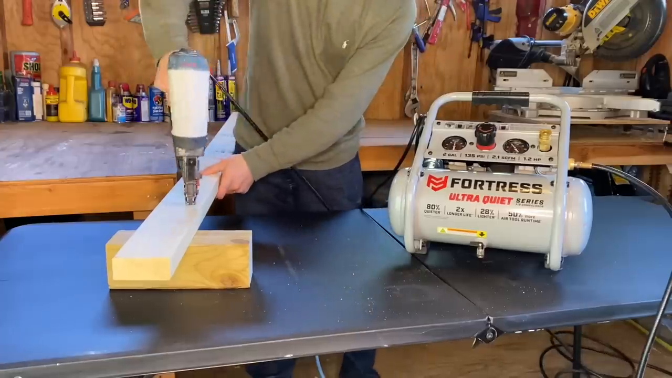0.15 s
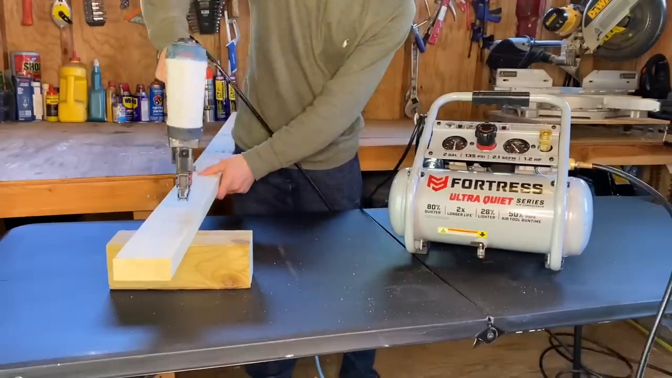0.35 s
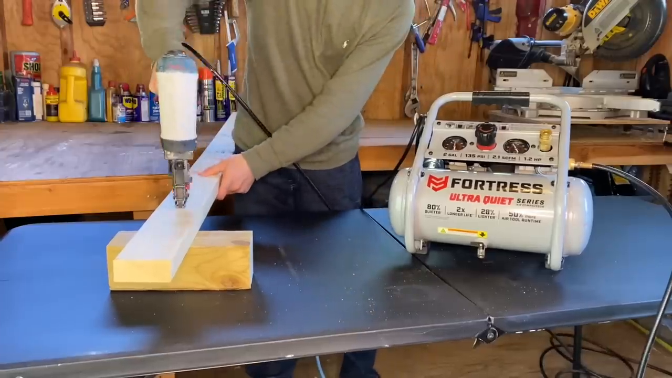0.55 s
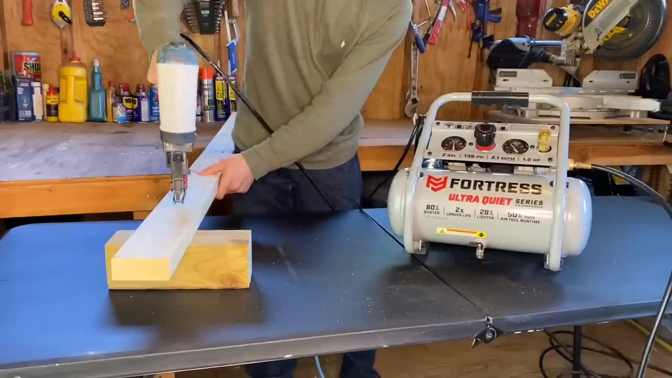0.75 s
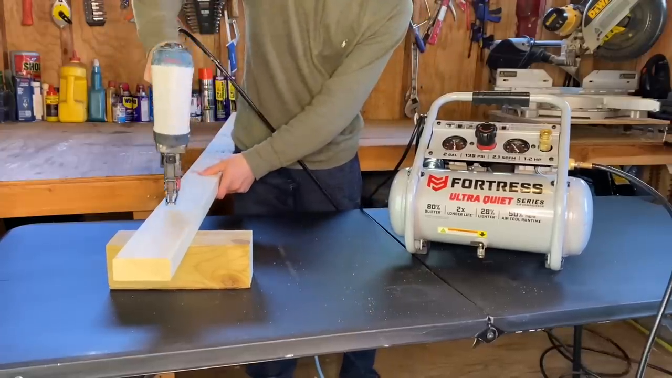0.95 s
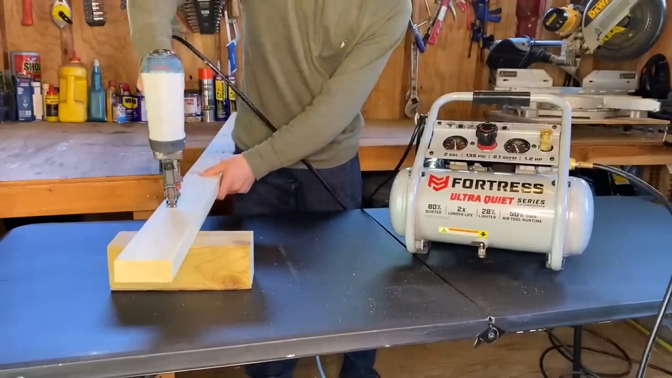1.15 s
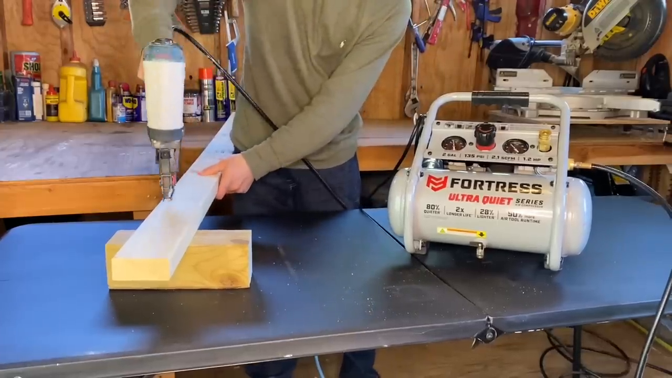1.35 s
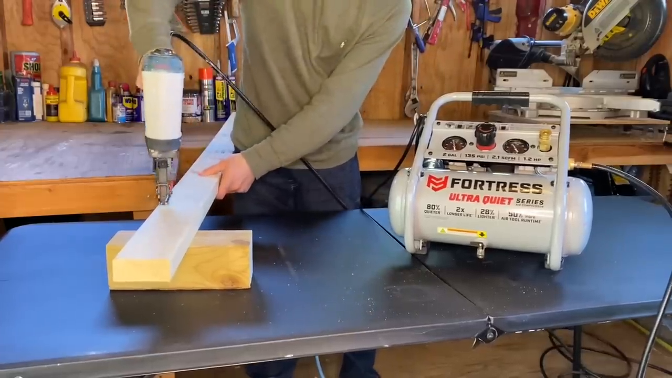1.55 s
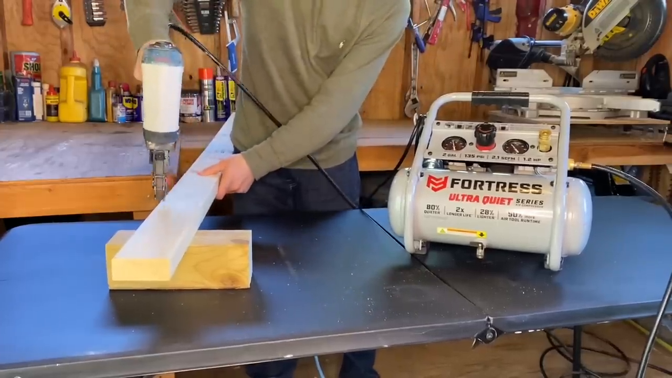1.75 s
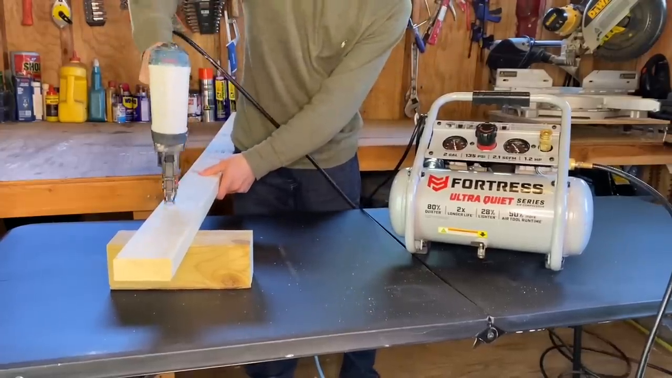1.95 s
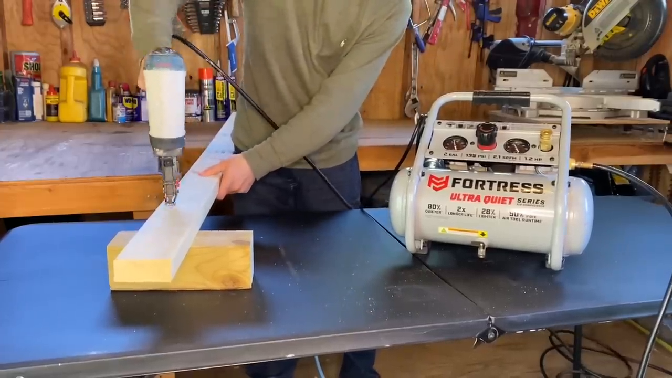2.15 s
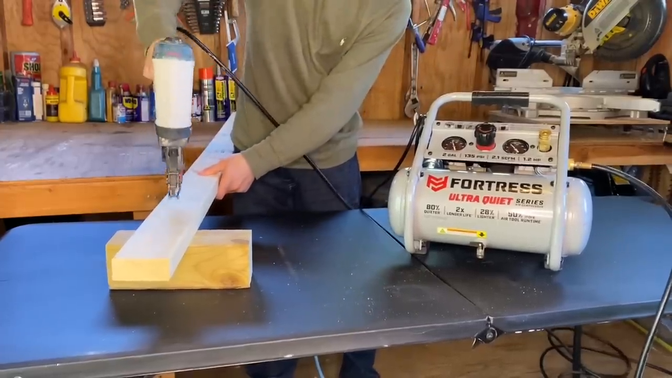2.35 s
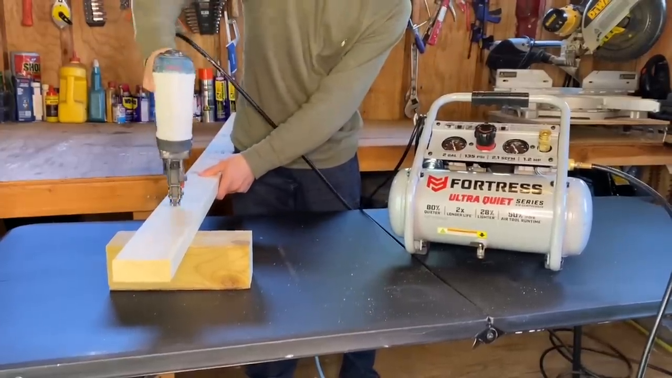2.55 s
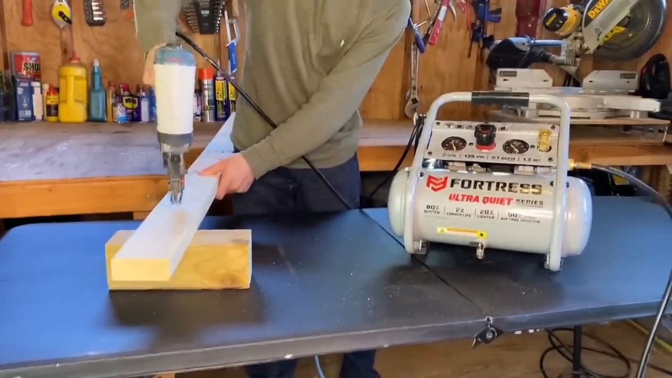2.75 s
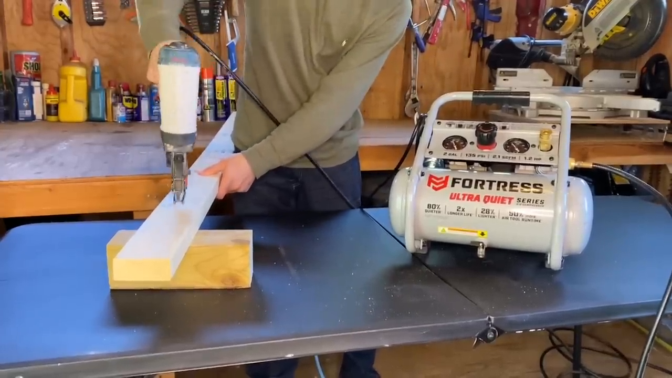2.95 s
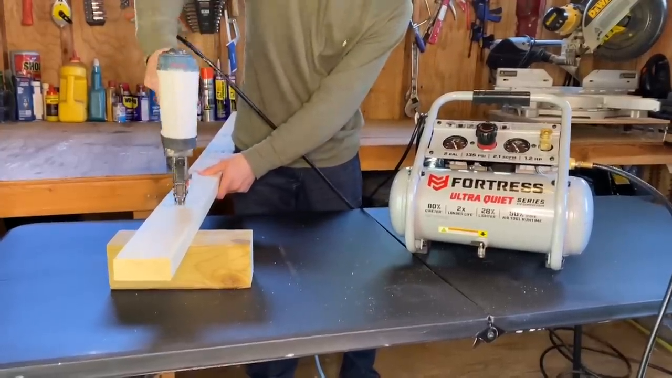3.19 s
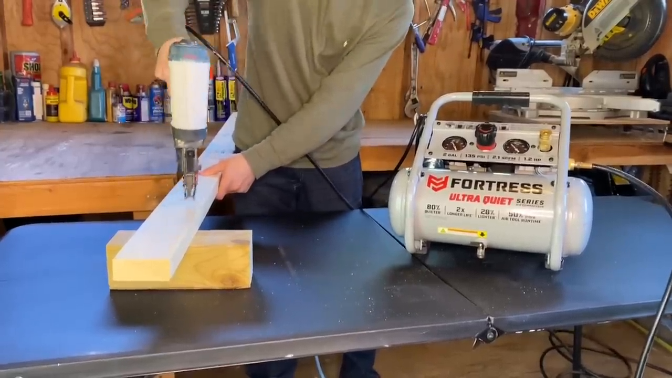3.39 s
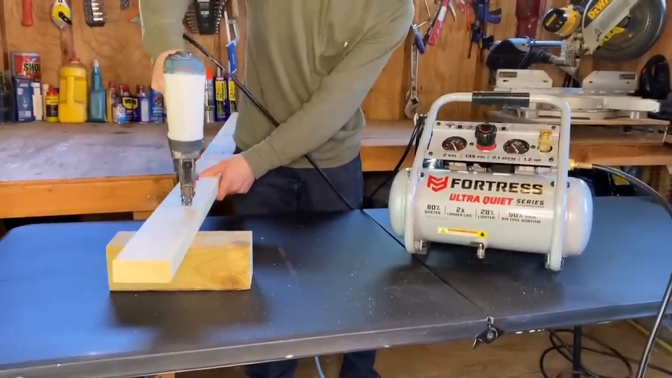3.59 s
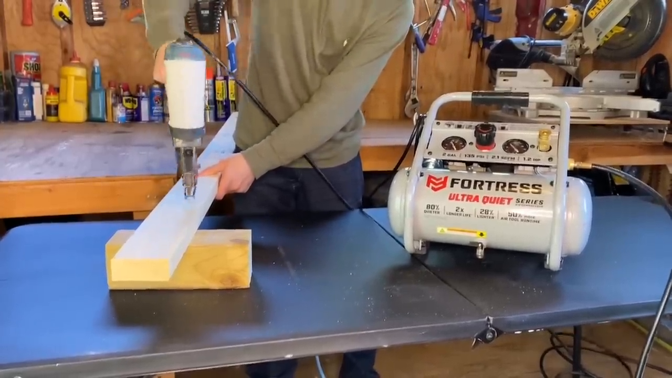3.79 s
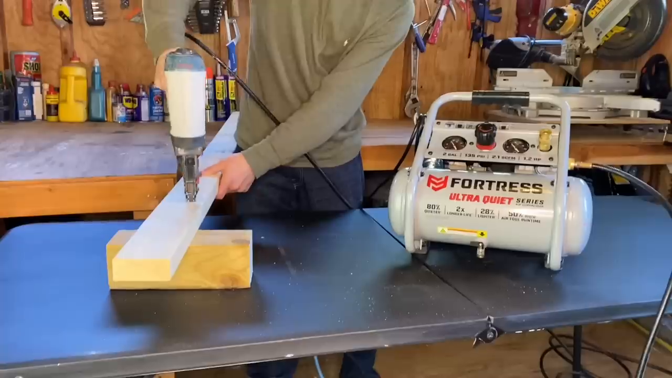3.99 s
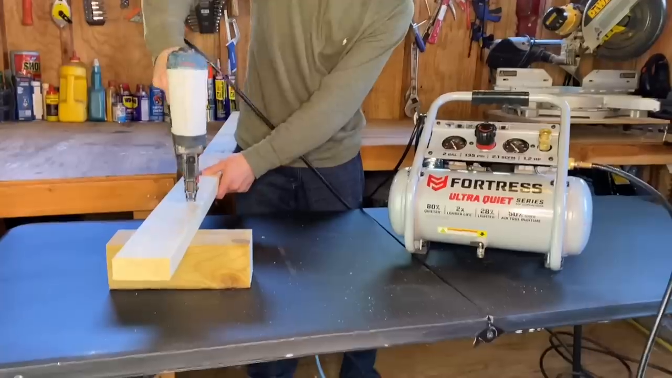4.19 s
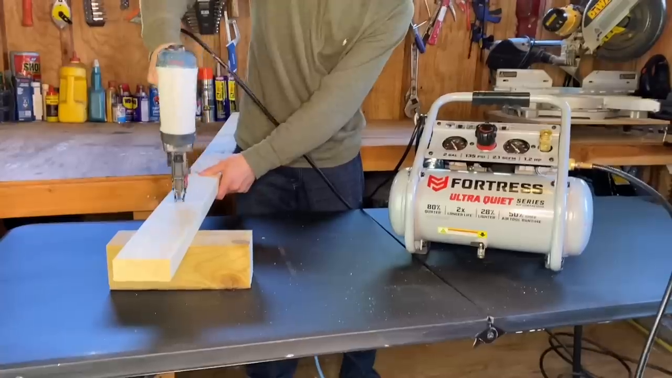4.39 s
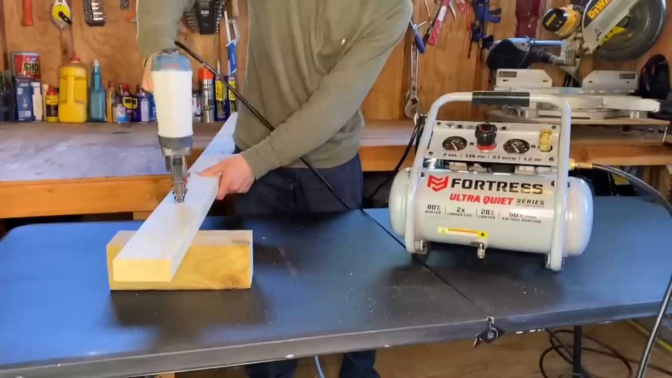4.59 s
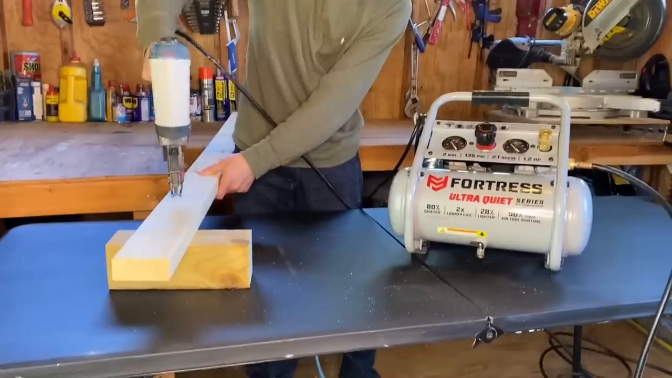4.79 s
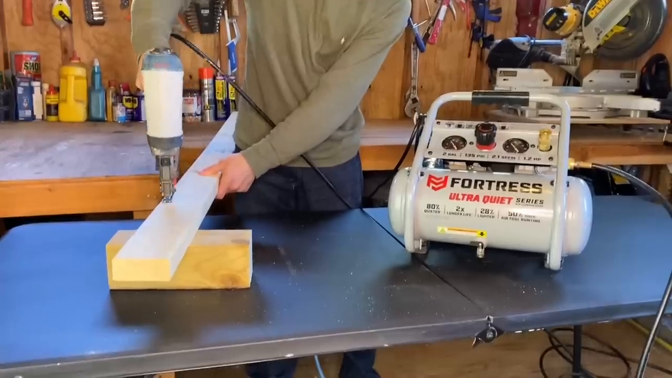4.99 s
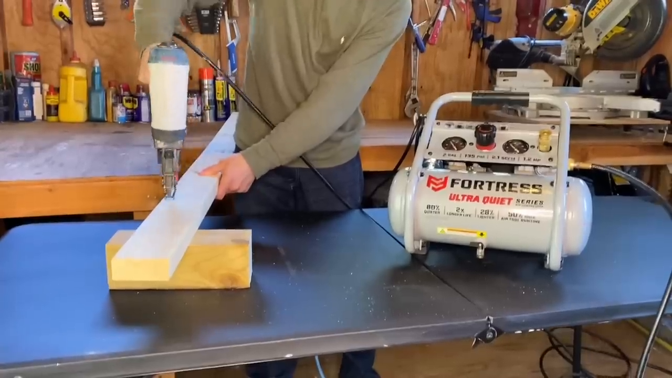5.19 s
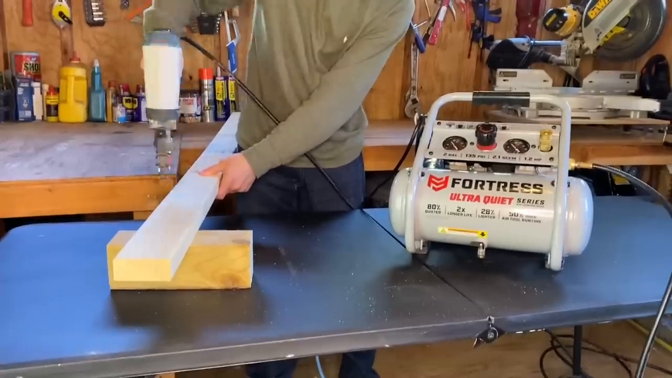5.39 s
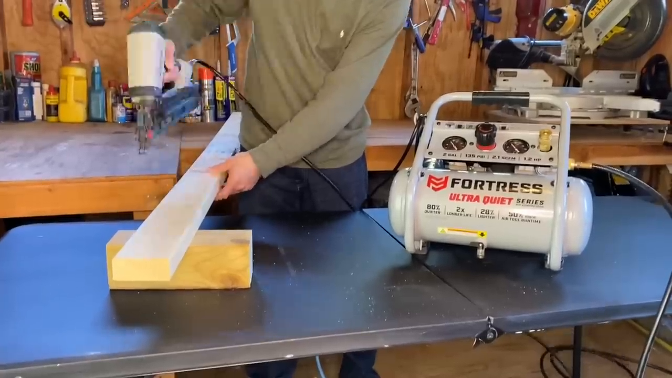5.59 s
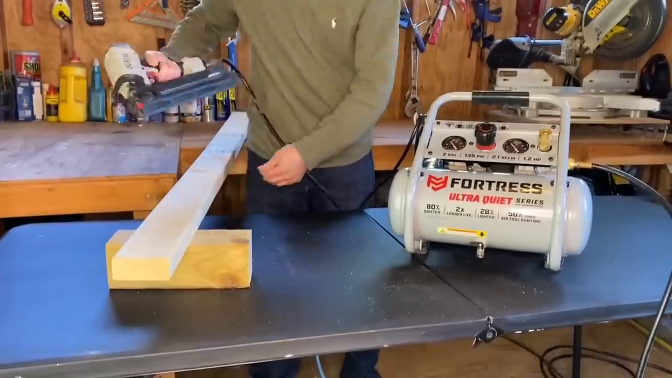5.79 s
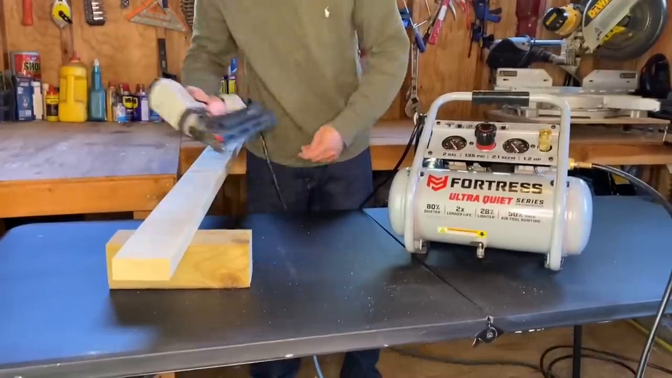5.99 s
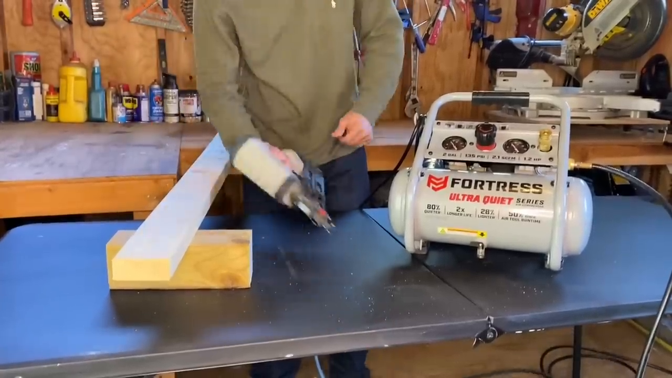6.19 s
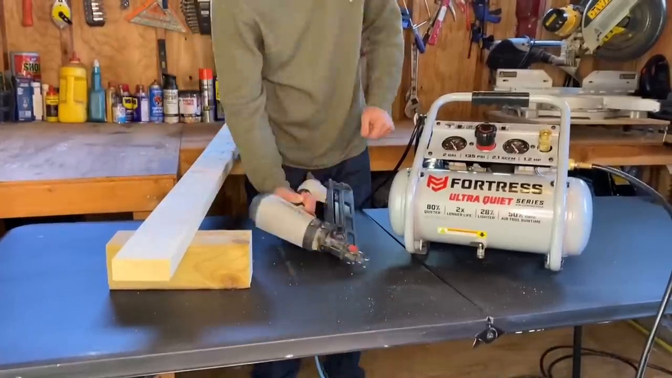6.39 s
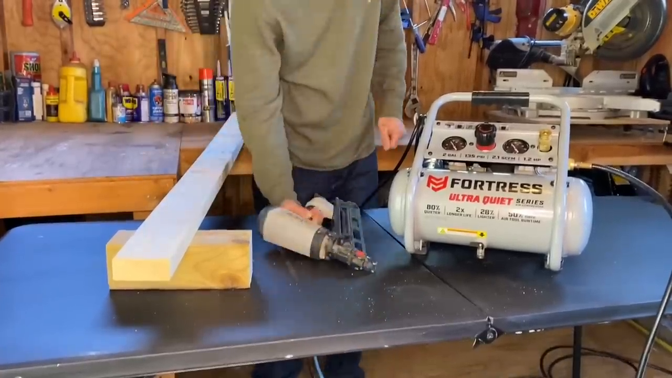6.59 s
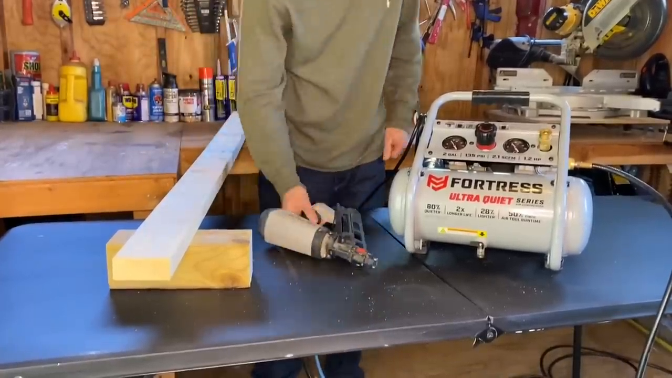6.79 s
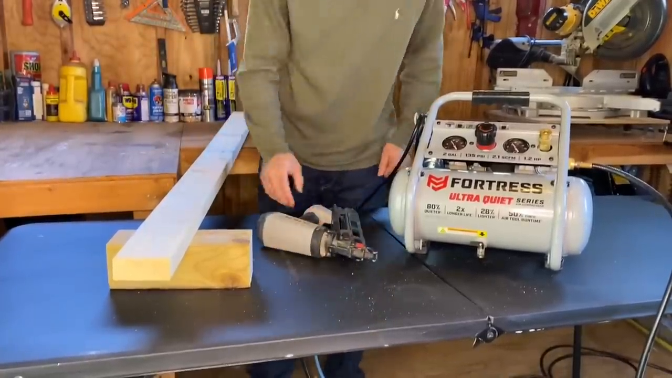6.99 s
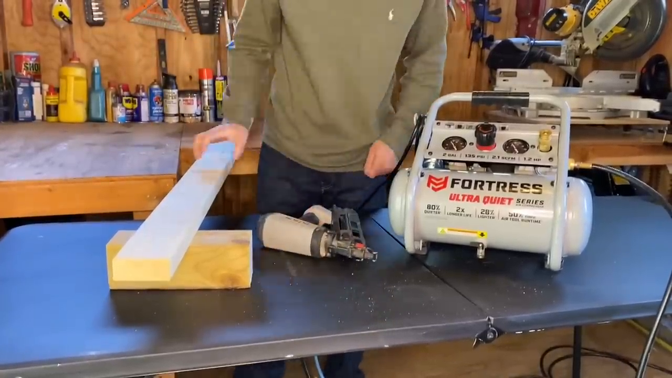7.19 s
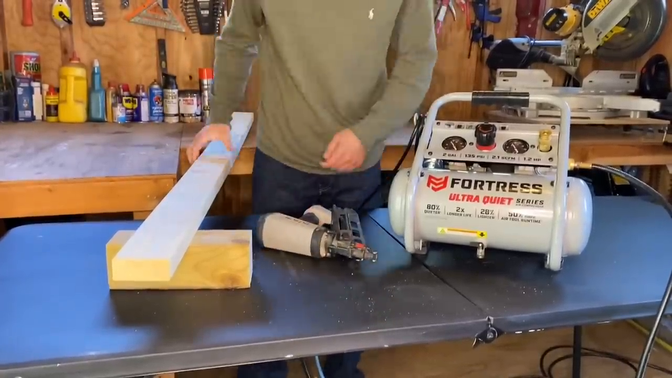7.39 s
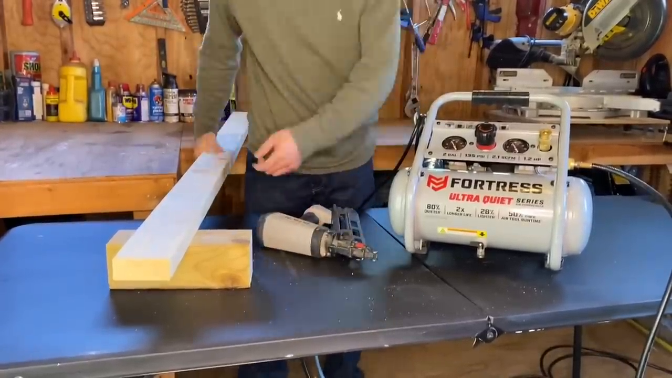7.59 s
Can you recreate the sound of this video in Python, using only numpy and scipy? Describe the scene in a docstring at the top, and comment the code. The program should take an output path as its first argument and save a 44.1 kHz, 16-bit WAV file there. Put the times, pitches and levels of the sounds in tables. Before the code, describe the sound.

A pneumatic nailer fires into a wooden board right from the start, eleven shots about half a second apart, the last at around 5 seconds. Each is a pop and a hard metallic crack with a woody thud, followed at once by a spurt of exhaust air and a smaller knock. The shots are loud enough to overload the microphone slightly and die away quickly in a small workshop. Between them the nose of the tool taps lightly on the wood. At about 1.8 seconds a quiet compressor starts with a brief, faint hiss and settles into a low, steady hum with a fine rattle, far below the shots. From about 6.3 to 7 seconds the nailer is laid on a table with a small steel click and several soft thuds and knocks. The compressor hums on until the end, near 7.7 seconds.

```python
"""Pneumatic nailer in a small workshop

Eleven nails are driven into a board on a folding table, loud enough to overload the microphone.
Each shot is a valve pop, the driver's impact, a jet of exhaust and the knock of the returning piston;
between shots the nose taps the wood. A quiet compressor starts after the fourth shot and hums on.
At the end the nailer is laid on the table."""
import sys
import numpy as np
from scipy import signal
from scipy.fft import rfft, irfft, next_fast_len
from scipy.io import wavfile
from scipy.ndimage import map_coordinates

SR = 44100
rng = np.random.default_rng(int(sys.argv[2]) if len(sys.argv) > 2 else 0)


def waveform_to_disk(signal):
    """Save audio, clipped to [-1, 1], as 16-bit WAV at the path in sys.argv[1]."""
    frames = np.transpose(np.atleast_2d(signal))
    scaled = np.clip(frames, -1, 1) * 32767
    samples = np.round(scaled).astype(np.int16)
    wavfile.write(sys.argv[1], SR, samples)


N = 337263
CLOCK = np.arange(N) / SR  # time in the scene [s]
T = np.arange(SR // 2) / SR  # time since an impact [s]
COMPRESSOR_ON_S = 1.796

# shots: (time of the valve pop [s], steel clash gain [dB], exhaust gain [dB])
SHOTS = [(-.029, 1.5, 0.5), (0.5345, 1, 1), (1.0467, 0.5, 1), (1.536, 1.5, 0.5), (2.0412, 0, 0.5),
         (2.5196, 1, 1.5), (3.0173, -2, 0.5), (3.5098, -5, 1), (3.9814, 1, 2.5), (4.4484, 0.5, 1),
         (4.9575, -3, 0)]
# spectra of a thud on the table and a click of steel: (frequency [Hz], relative density [dB])
THUD_SPECTRUM = [(40, -18), (85, -7), (130, -1), (180, -1), (250, -9.5), (400, -8.5), (700, -46),
                 (3000, -73), (16000, -120)]
CLICK_SPECTRUM = [(2500, -7), (4000, 2.5), (6000, -8.5), (8500, -8), (13000, -24), (16000, -33)]


def amp(db):
    """Amplitude ratio of a level in decibels."""
    return 10 ** (np.asarray(db) / 20)


def unit(x):
    """Normalisation to an rms of 1."""
    return x / np.sqrt(np.mean(x ** 2) + 1e-20)


def along(points, hz):
    """Interpolation of (frequency [Hz], value) points on a logarithmic frequency axis."""
    f, v = np.transpose(points)
    return np.interp(np.log(hz + 1), np.log(f + 1), v)


def filtered(x, gain):
    """Zero-phase filtering: the spectrum is multiplied by gain(frequency)."""
    m = next_fast_len(len(x) + 4096)
    return irfft(rfft(x, m) * gain(np.fft.rfftfreq(m, 1 / SR)), m)[:len(x)]


def noise(spectrum, size=len(T)):
    """White noise shaped by a spectral envelope, at an rms of 1."""
    return unit(filtered(rng.standard_normal(size), lambda hz: amp(along(spectrum, hz))))


def add(track, s, sound):
    """Superposition of a sound on the track from time s."""
    i = round(s * SR)
    part = sound[max(-i, 0):max(N - i, 0)]
    track[max(i, 0):max(i, 0) + len(part)] += part


def fade(t60, attack):
    """Envelope of a damped vibration: a quick rise, and a fall of 60 dB in t60 seconds."""
    return amp(-60 * T / t60) * (1 - np.exp(-T / attack))


def rise(start, attack_s):
    """Linear onset: 0 until start, then a ramp to 1."""
    return np.clip((CLOCK - start) / attack_s, 0, 1)


def release(start, t60):
    """Free decay: 1 until start, then an exponential fall."""
    return amp(-60 * np.maximum(CLOCK - start, 0) / t60)


def room_decay(x):
    """Absorption: each frequency dies away with the room's reverberation time."""
    # (frequency [Hz], reverberation time [s])
    decay_times = [(100, 0.51), (400, 0.37), (1000, 0.31), (4000, 0.35), (8000, 0.34), (16000, 0.27)]
    hz, t, spectra = signal.stft(x, SR, nperseg=256)
    decay = amp(-60 * t / along(decay_times, hz)[:, None])
    return signal.istft(spectra * decay, SR, nperseg=256)[1][:len(x)]


def ripple(depth_db=2, spacing_hz=45):
    """Dense resonances of a metal body: a gain with random peaks and dips over frequency."""
    knots = rng.standard_normal(4000)
    return lambda hz: amp(depth_db * np.interp(hz / spacing_hz, np.arange(len(knots)), knots))


def bursts(spectrum, alike_hz):
    """Scattering, one burst a shot: long waves repeat their path, short ones scatter anew."""
    coherence = lambda hz: .8 / (1 + (hz / alike_hz) ** 4)
    repeated = filtered(noise(spectrum), lambda hz: np.sqrt(coherence(hz)))
    metal = ripple()
    fresh = [unit(filtered(noise(spectrum), metal)) for _ in SHOTS]
    return [room_decay(repeated + filtered(x, lambda hz: np.sqrt(1 - coherence(hz)))) for x in fresh]


def rings(modes, detune, spread_db=0):
    """Modal synthesis, one undamped ring a shot: each new point of impact shifts the modes a little."""
    hz, db = np.transpose(modes)[:, :, None]
    phase = rng.uniform(0, 2 * np.pi, hz.shape)
    size = amp(db) / np.sqrt(np.sum(amp(db) ** 2) / 2)
    chance = rng.standard_normal((len(SHOTS), 2) + hz.shape)
    return [np.sum(amp(spread_db * louder) * size
                   * np.sin(2 * np.pi * hz * (1 + detune * sharper) * T + phase), 0)
            for louder, sharper in chance]


def room_tone():
    """The noise floor of the quiet shop: stationary and strongest in the bass."""
    # (frequency [Hz], relative density [dB])
    spectrum = [(20, -10), (45, -2), (110, -4.5), (300, -21), (1000, -19), (2000, -28), (4500, -26.5),
                (6500, -38), (8700, -31), (11000, -47), (16000, -47.5)]
    return amp(-54) * noise(spectrum, N)


def casing(hz):
    """Resonance: the gain with which the pump's head and casing colour its noise."""
    # (centre frequency [Hz], half width [Hz], boost [dB])
    resonances = [(2680, 120, 3.5), (3840, 120, 4), (4820, 110, 5.5), (7860, 200, 5.5)]
    return amp(sum(db / (1 + ((hz - centre) / width) ** 2) for centre, width, db in resonances))


def compressor(stroke_hz=28.02, hum_hz=120, frame_hz=176, lag_s=.033, spin_up_s=.075, surge_db=4):
    """Periodic forcing: each stroke rattles and draws air; the motor's hum beats with the 4th harmonic."""
    # one stroke's rattle: (frequency [Hz], relative level [dB])
    rattle_spectrum = [(140, -39), (250, 5), (340, 5.5), (480, -3.5), (580, -1), (700, -2.5), (900, 8),
                       (1100, 5), (1350, -11.5), (2000, -12), (2700, -4.5), (3700, -7), (4300, -19),
                       (8000, -18), (14000, -41)]
    # intake air: (frequency [Hz], relative density [dB])
    intake_spectrum = [(94, -30), (160, -1), (249, -15), (345, -8), (366, -26), (498, -11), (558, -20),
                       (717, -21), (774, -15), (976, -7.5), (1740, -14.5), (3540, -11.5), (5510, -29.5),
                       (10200, -31), (15900, -63)]
    # strong harmonics: (multiple of the stroke rate [1]) and, for each, (level [dB])
    orders = np.array([1, 2, 3, 4, 6, 8, 25, 26, 30, 33, 34, 36, 38, 42])
    order_db = [-61, -51.5, -54.5, -51, -75, -56.5, -54.5, -56.5, -60, -54.5, -55.5, -54.5, -57.5, -55]
    drift = map_coordinates(rng.standard_normal(40), [CLOCK * 4])
    turns = stroke_hz * CLOCK + .0026 * drift
    size = 2048  # samples in one stroke
    hz = np.arange(size // 2 + 1) * stroke_hz
    phases = np.exp(2j * np.pi * rng.random(len(hz)))
    stroke = unit(irfft(amp(along(rattle_spectrum, hz)) * casing(hz) * phases))
    rattle = amp(-46) * map_coordinates(stroke, [turns % 1 * size], mode="grid-wrap")
    shake = sum(amp(db) * np.sqrt(2) * np.sin(2 * np.pi * (k * turns + rng.random()))
                for k, db in zip(orders, order_db))
    pulsing = 1 + .17 * (np.cos(2 * np.pi * 8 * turns) + np.cos(2 * np.pi * 3 * turns))
    metal = ripple()
    intake = filtered(noise(intake_spectrum, N), lambda f: casing(f) * metal(f))
    air = amp(-44) * unit(pulsing * intake)
    frame_mode = lambda f: 1 / (1 + ((f - frame_hz) / 4) ** 2)
    frame = amp(-50) * unit(filtered(rng.standard_normal(N), frame_mode))
    hum = amp(-44) * np.sqrt(2) * np.sin(2 * np.pi * hum_hz * CLOCK)
    pump_level = rise(COMPRESSOR_ON_S + lag_s, spin_up_s)  # the pump follows the motor
    strain = amp(surge_db * release(COMPRESSOR_ON_S + lag_s + spin_up_s, t60=1.3))
    motor_level = rise(COMPRESSOR_ON_S, attack_s=.066) * strain
    return pump_level * (rattle + shake + air + frame) + motor_level * hum


def start_hiss(attack_s=.04, hold_s=.068):
    """Turbulence: air hisses briefly as the compressor starts."""
    # (frequency [Hz], relative density [dB])
    spectrum = [(2000, -17), (4500, -3), (8500, 8), (11000, 0), (16000, -20)]
    level = rise(COMPRESSOR_ON_S, attack_s) * release(COMPRESSOR_ON_S + attack_s + hold_s, t60=.32)
    return amp(-47) * level * noise(spectrum, N)


def table_sway(attack_s=.064):
    """Damped vibration: each shift of weight rocks the table top, far down in the bass."""
    # the table takes the tool's weight, the hands let go: (time [s], relative level [dB])
    sways = [(6.31, -19.5), (6.64, -22.5), (7.02, -21), (7.26, -27.5)]
    # (frequency [Hz], relative density [dB])
    spectrum = [(5, -24), (12, 12.5), (22, -5), (32, -22), (60, -47), (200, -90)]
    level = sum(amp(db) * rise(s, attack_s) * release(s + attack_s, t60=.76) for s, db in sways)
    return amp(-1) * level * noise(spectrum, N)


def laying_down():
    """A series of impacts: the steel nose clicks down, then table and housing bump as the tool settles."""
    # (time [s], table thud level [dB], housing knock level [dB])
    bumps = [(6.335, -31, -33.5), (6.356, -27.5, -49), (6.4, -32, -42), (6.495, -31, -35.5),
             (6.547, -33.5, -55), (6.641, -41, -31.5), (6.68, -33, -39), (6.868, -34.5, -39.5),
             (6.903, -33.5, -57), (6.978, -37.5, -60)]
    # (frequency [Hz], relative density [dB])
    housing_spectrum = [(150, -29), (300, 0), (450, -2.5), (620, -5), (850, -17), (2000, -19), (6000, -43),
                        (16000, -90)]
    out = np.zeros(N)
    add(out, bumps[0][0], amp(-42) * noise(CLICK_SPECTRUM) * fade(t60=.14, attack=.00082))
    for s, thud_db, knock_db in bumps:
        table = amp(thud_db) * noise(THUD_SPECTRUM) * fade(t60=1.8, attack=.003)
        housing = amp(knock_db) * noise(housing_spectrum) * fade(t60=1, attack=.00079)
        add(out, s, room_decay(table + housing))
    return out


def nose_taps(travel_s=.046):
    """Contact noise: the nose touches, then seats, exciting wood, table, steel and the safety catch."""
    # nose pressed home: (time [s], wood gain [dB], table gain [dB])
    presses = [(0.429, -15, -24.5), (0.917, -21, -24.5), (1.409, -21.5, -31.5), (1.919, -23, -26.5),
               (2.411, -19.5, -28), (2.949, -24.5, -40), (3.413, -19, -32), (3.905, -13.5, -29.5),
               (4.383, -27, -42)]
    # stray clicks as the tool is moved: (time [s], steel gain [dB])
    clicks = [(0.398, -36), (1.725, -28.5), (5.354, -46)]
    # (frequency [Hz], relative density [dB])
    wood_spectrum = [(200, -7), (400, 3.5), (900, 7), (1800, -5), (3700, -1.5), (5500, -32), (12000, -45)]
    # (frequency [Hz], relative level [dB])
    catch_modes = [(3050, 3.5), (3650, -6), (4850, -9), (6830, -7), (8660, -14), (13260, -19)]
    # (time [s], wood gain [dB], table gain [dB], steel gain [dB])
    contacts = [(s - travel_s, -24, -39, -51) for s, _, _ in presses]  # the first light touch
    contacts += [(s, wood_db, table_db, -41) for s, wood_db, table_db in presses]
    contacts += [(s, db + 13, db - 6, db) for s, db in clicks]
    out = np.zeros(N)
    for s, wood_db, table_db, steel_db in contacts:
        wood = amp(wood_db - 15) * noise(wood_spectrum) * fade(t60=1, attack=.0013)
        table = amp(table_db - 1) * noise(THUD_SPECTRUM) * fade(t60=8.3, attack=.013)
        steel = amp(steel_db - 1) * noise(CLICK_SPECTRUM) * (fade(t60=.076, attack=.00033) + amp(-9.5))
        catch = sum(amp(db + rng.normal(0, 2)) * np.sin(2 * np.pi * hz * T) for hz, db in catch_modes)
        ping = amp(steel_db - 13) * catch * fade(t60=.2, attack=.0005)
        add(out, s, room_decay(wood + table + steel) + ping)
    return out


def piston(return_s=.1124, lag_s_per_shot=.001):
    """Impact and reflection: the piston knocks on its seat, later each shot as the tank drains."""
    # (frequency [Hz], relative density [dB])
    body_spectrum = [(60, -10), (170, -14), (260, -24), (400, -12.5), (750, 0.5), (1100, -5.5),
                     (1500, -4.5), (2200, -18), (3600, -14.5), (5000, -17.5), (12000, -32)]
    # (frequency [Hz], relative level [dB])
    seat_modes = [(365, -4.5), (561, -22), (633, -16.5), (715, 0), (755, 0), (812, -21), (908, -24),
                  (964, -4), (1034, -6.5), (1366, -6)]
    # direct sound, then echoes from bench and walls: (delay [s], gain [dB])
    paths = [(0, 0), (.0032, -4), (.0108, -7), (.0142, -7)]
    knock = amp(-2) * np.sin(2 * np.pi * 880 * T) * fade(t60=.009, attack=.0001)
    bodies = bursts(body_spectrum, alike_hz=2500)
    seats = rings(seat_modes, detune=.014, spread_db=4)
    out = np.zeros(N)
    for fired, ((s, _, _), body, seat) in enumerate(zip(SHOTS, bodies, seats)):
        at = s + return_s + lag_s_per_shot * fired
        add(out, at, amp(-18.5) * body * fade(t60=1, attack=.00026))
        add(out, at, amp(-21) * seat * fade(t60=.19, attack=.0004))
        for delay, db in paths:
            add(out, at + delay, amp(db) * knock)
    return out


def exhaust(delay_s=.066):
    """Jet noise: spent air spurts out of the cap, then trails off."""
    # (frequency [Hz], relative density [dB])
    jet_spectrum = [(1500, -38), (3500, 1), (5500, -8.5), (8500, -1.5), (11000, -8.5), (16000, -23.5)]
    flow = amp(-16) * fade(t60=.06, attack=.002) + amp(-20) * fade(t60=4.3, attack=.002)
    out = np.zeros(N)
    for (s, _, db), air in zip(SHOTS, bursts(jet_spectrum, alike_hz=1000)):
        add(out, s + delay_s, amp(db) * flow * air)
    return out


def valve(dip_s=.00078, snap_s=.00014, lead_s=.002, echo_s=.0036):
    """A pressure transient: the valve opens, pressure sinks and snaps back, air fills the cylinder."""
    # (frequency [Hz], relative density [dB])
    inrush_spectrum = [(59, -37.5), (100, 4.5), (569, 4.5), (869, -4.5), (1510, 3), (1900, -4), (2210, -2),
                       (3100, 0), (4740, -13), (5380, -16.5), (6650, -18), (7390, -6.5), (9140, -13),
                       (15900, -30)]
    t = T - lead_s  # time from the spike
    before_spike = (1 - np.tanh(2 * (t + snap_s) / snap_s)) / 2
    pop = np.exp(-(t / snap_s) ** 2) - .75 * np.exp(-(t / dip_s) ** 2) * before_spike
    flow = amp(-15) * fade(t60=.0033, attack=.001) + amp(-16.5) * fade(t60=4.3, attack=.00054)
    out = np.zeros(N)
    for (s, _, _), air in zip(SHOTS, bursts(inrush_spectrum, alike_hz=3000)):
        add(out, s - lead_s, amp(-1.5) * pop)
        add(out, s - lead_s + echo_s, amp(-8) * pop)  # reflection from a near surface
        add(out, s, flow * air)
    return out


def nail():
    """Broadband noise of steel on steel, coloured by new resonances at each contact."""
    # (frequency [Hz], relative density [dB])
    spectrum = [(600, -29), (1400, 2.5), (2200, -5), (3500, -2), (5000, -8), (9000, -8.5), (16000, -27)]
    colour = ripple(depth_db=3, spacing_hz=450)
    return unit(filtered(noise(spectrum), colour))


def driver_blow(travel_s=.0256, sink_s=.003, full_tank_db=.84, sag_db_per_shot=.08):
    """Impact excitation: the driver cracks on the nail, bottoms out and sets board and tool ringing."""
    # (frequency [Hz], relative density [dB])
    body_spectrum = [(30, -4), (50, -10), (70, -2), (125, -5), (250, 0.5), (500, 1), (900, 2), (1500, -5),
                     (1900, -5), (2500, -4.5), (3600, -2.5), (4800, -13), (6500, -16), (8500, -17.5),
                     (16000, -51)]
    # modes of board and tool, and of thin steel parts: (frequency [Hz], relative level [dB])
    board_modes = [(175, -0.5), (330, -7.5), (373, -4.5), (405, -8), (448, -7), (560, -4), (619, -6),
                   (799, -6.5), (838, -24), (876, -16), (1082, -11.5), (1114, -11.5), (1144, -10.5),
                   (1198, -9.5), (1283, -13), (1365, -10), (1523, -9.5), (1593, -10.5), (2250, -9.5),
                   (2295, -18), (2818, -12), (3015, -10), (3124, -12.5), (3502, -14), (3568, -14),
                   (3623, -10), (3678, -29), (3752, -13), (3818, -10), (3856, -11)]
    spring_modes = [(3070, 0), (3750, 19), (4600, 18), (5080, -4), (7600, 0.5), (8650, -10), (8930, -5.5),
                    (11150, -12)]
    push = amp(-4) * np.sin(2 * np.pi * 170 * T) * fade(t60=.008, attack=.0017)
    bodies = bursts(body_spectrum, alike_hz=2000)
    boards = rings(board_modes, detune=.00387)
    springs = rings(spring_modes, detune=.002, spread_db=3.5)
    out = np.zeros(N)
    for fired, (s, clash_db, _) in enumerate(SHOTS):
        force = amp(full_tank_db - sag_db_per_shot * fired)  # each shot drains the tank a little
        crack = amp(-6) * nail() * fade(t60=.049, attack=.000099)
        clash = amp(clash_db - 13) * room_decay(nail()) * fade(t60=.49, attack=.0011)
        body = amp(-6) * bodies[fired] * fade(t60=3.4, attack=.0019)
        board = amp(-6) * boards[fired] * fade(t60=.26, attack=.00011)
        spring = amp(-44) * springs[fired] * fade(t60=.65, attack=.001)
        add(out, s + travel_s, force * crack)
        add(out, s + travel_s + sink_s, force * (clash + body + board + push + spring))
    return out


def scene():
    """Superposition of nailer, handling, compressor and room tone in one channel."""
    shots = valve() + driver_blow() + exhaust() + piston()
    handling = nose_taps() + laying_down() + table_sway()
    return (shots + handling + compressor() + start_hiss() + room_tone())[None]


def record(dry, low_hz=8, top_hz=15900):
    """Saturation and band limiting: the blows clip softly, and the extremes of the spectrum are cut."""
    clipped = dry[0] / (1 + np.abs(dry[0]) ** 8) ** (1 / 8)
    return filtered(clipped, lambda hz: (hz < top_hz) * hz / np.hypot(hz, low_hz))[None]


dry = scene()
out = record(dry)
waveform_to_disk(out)
```